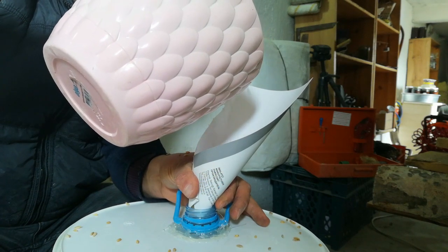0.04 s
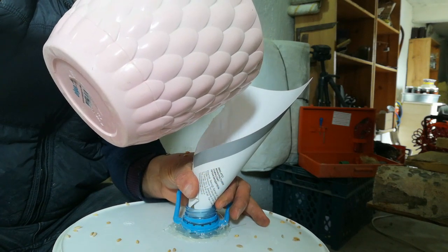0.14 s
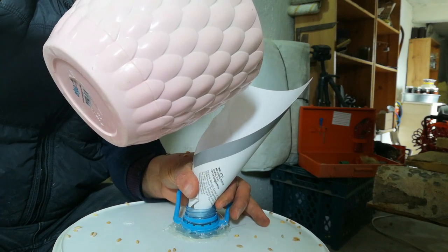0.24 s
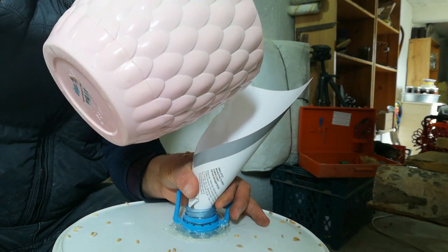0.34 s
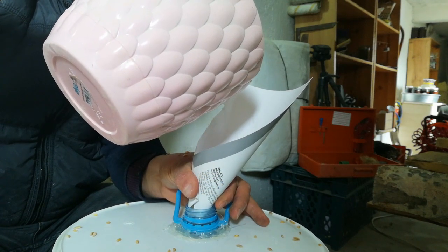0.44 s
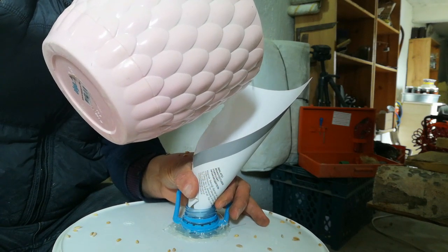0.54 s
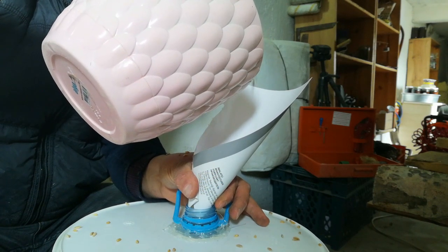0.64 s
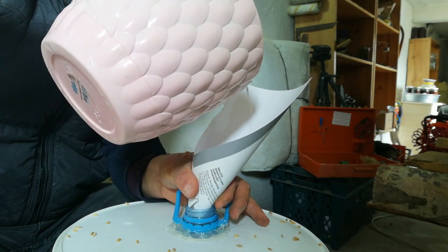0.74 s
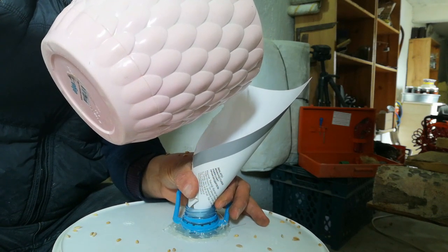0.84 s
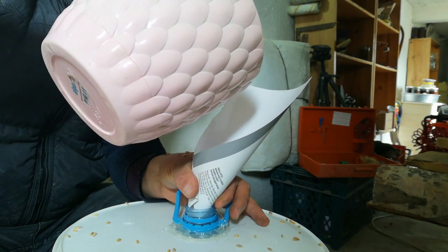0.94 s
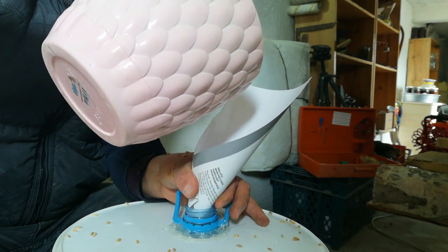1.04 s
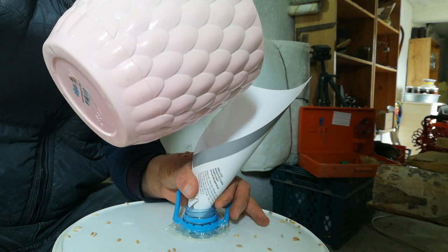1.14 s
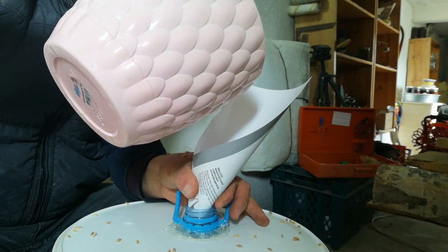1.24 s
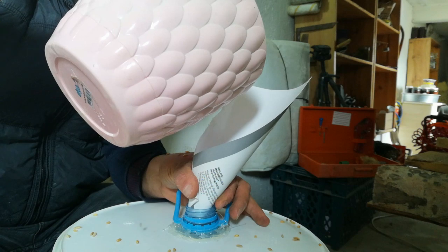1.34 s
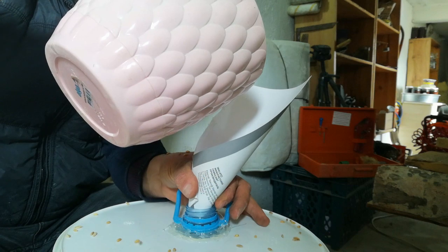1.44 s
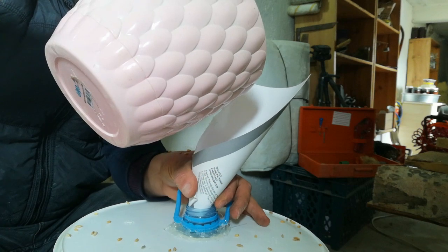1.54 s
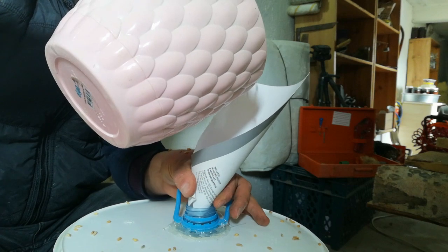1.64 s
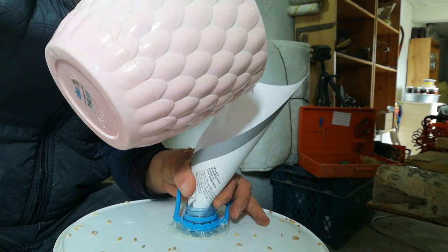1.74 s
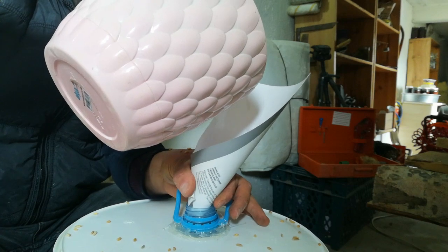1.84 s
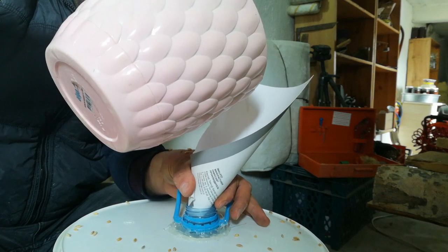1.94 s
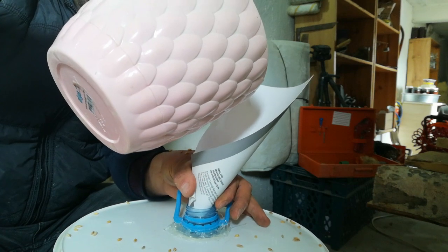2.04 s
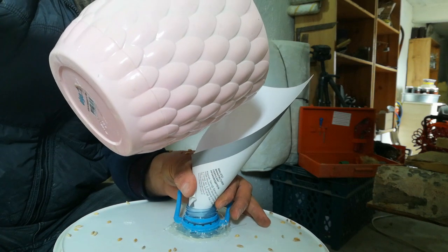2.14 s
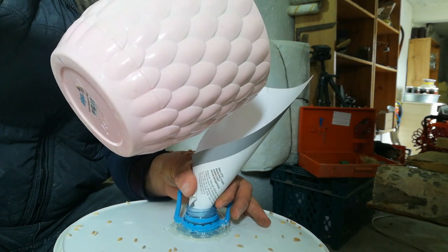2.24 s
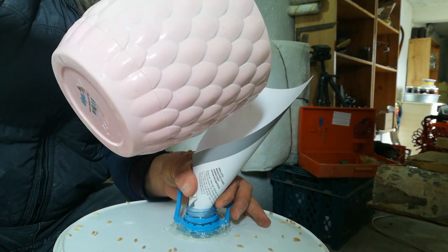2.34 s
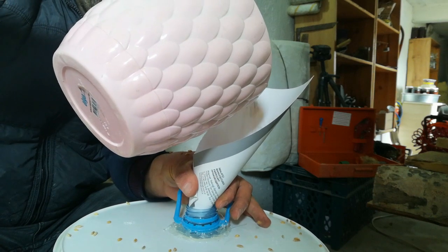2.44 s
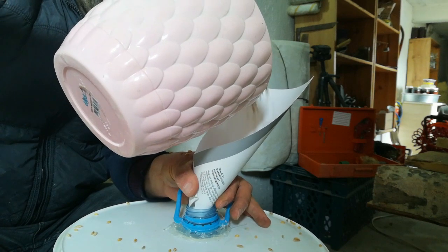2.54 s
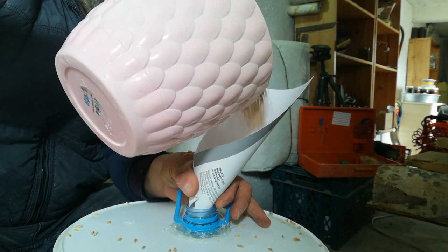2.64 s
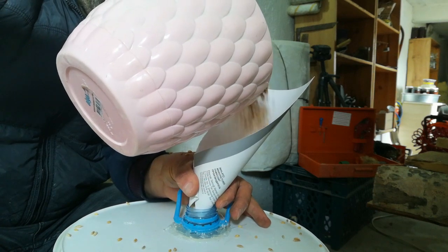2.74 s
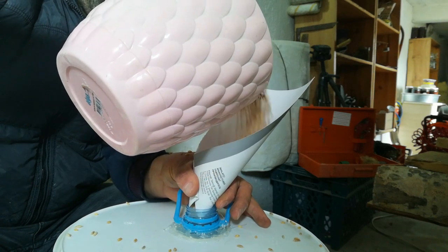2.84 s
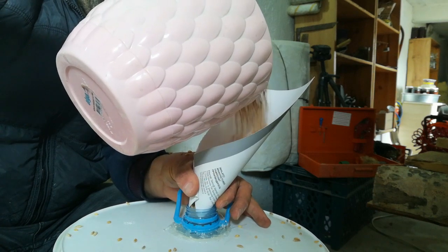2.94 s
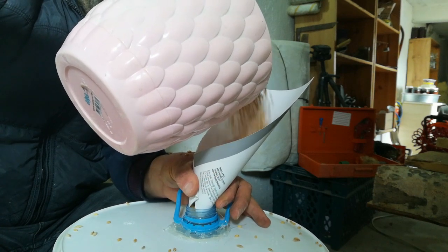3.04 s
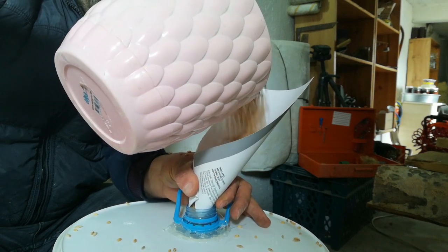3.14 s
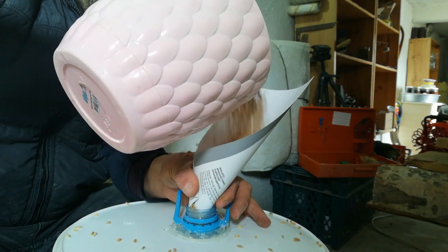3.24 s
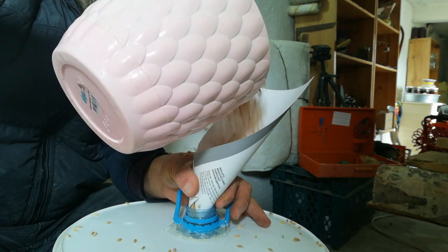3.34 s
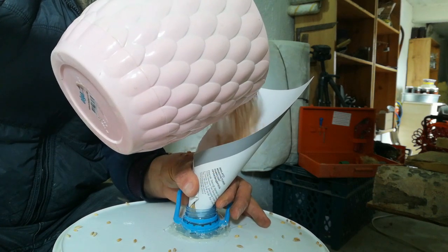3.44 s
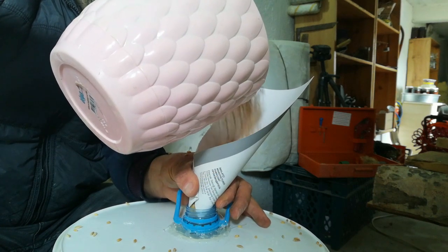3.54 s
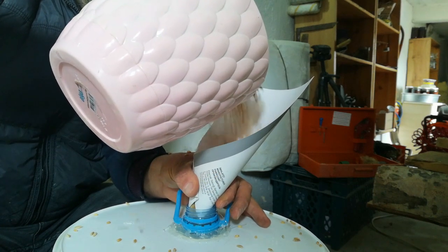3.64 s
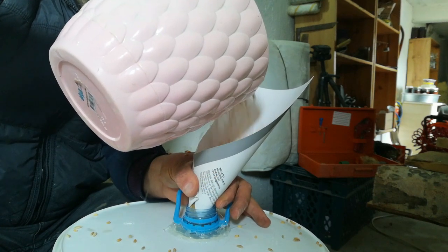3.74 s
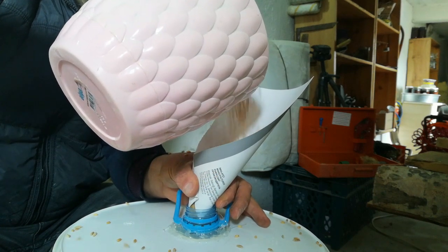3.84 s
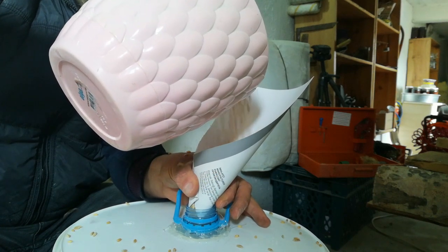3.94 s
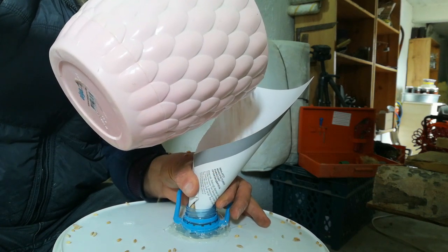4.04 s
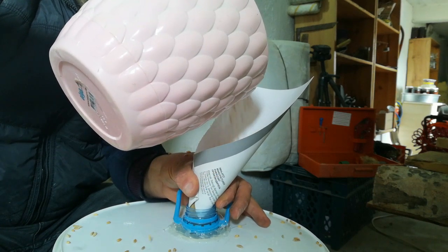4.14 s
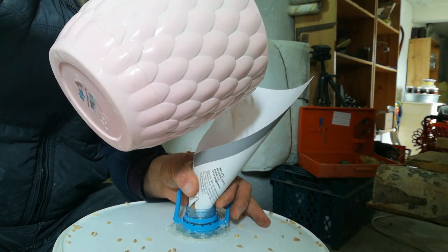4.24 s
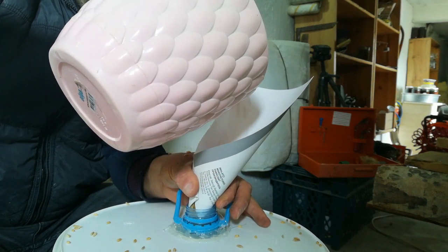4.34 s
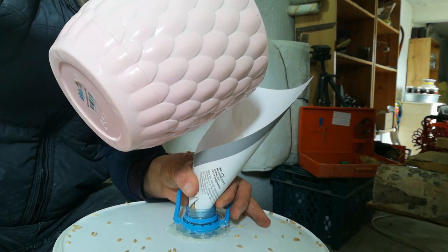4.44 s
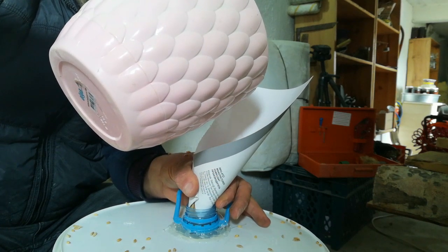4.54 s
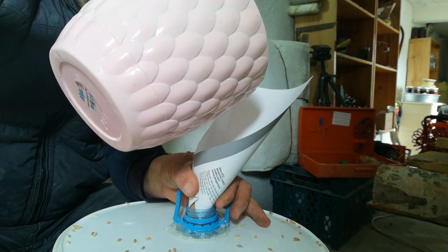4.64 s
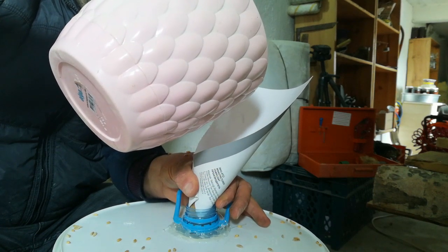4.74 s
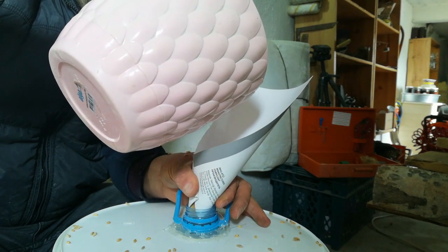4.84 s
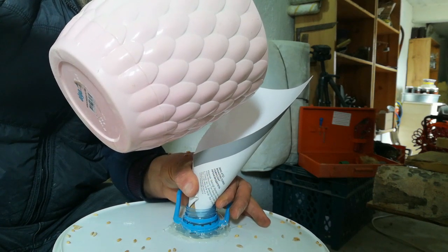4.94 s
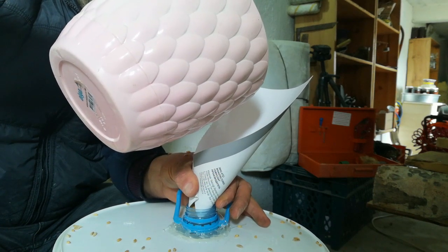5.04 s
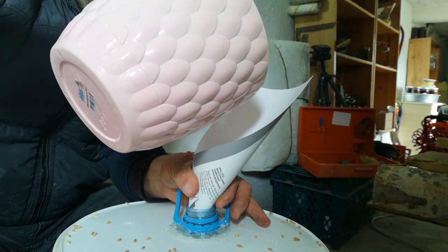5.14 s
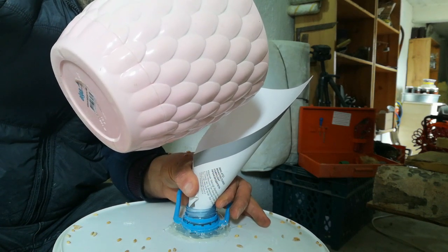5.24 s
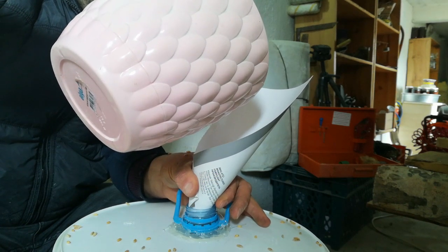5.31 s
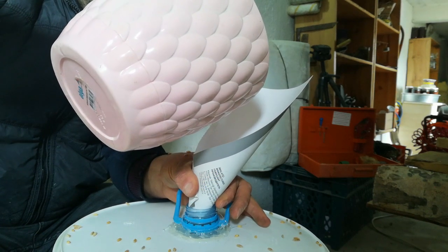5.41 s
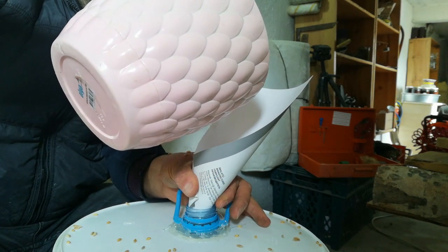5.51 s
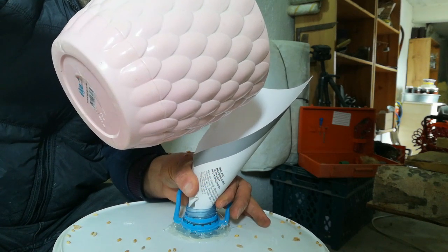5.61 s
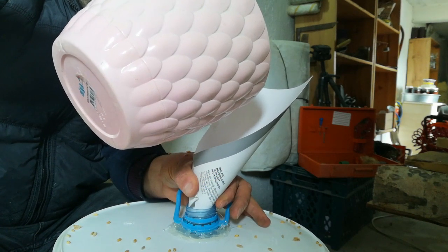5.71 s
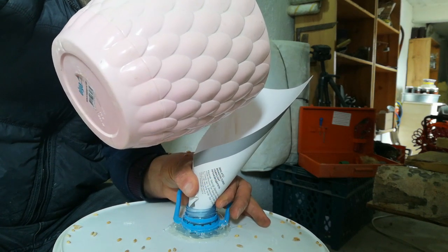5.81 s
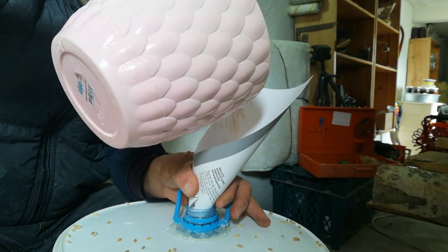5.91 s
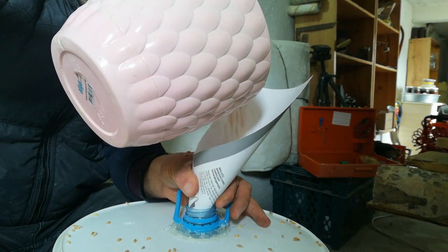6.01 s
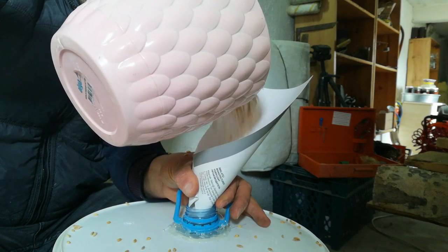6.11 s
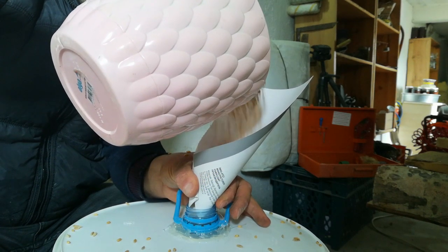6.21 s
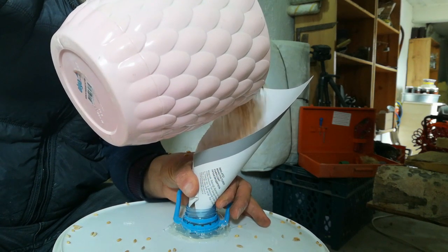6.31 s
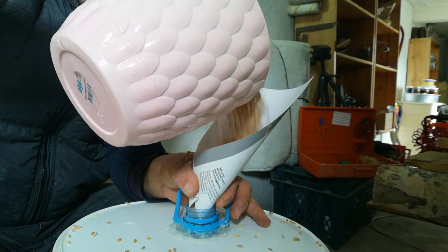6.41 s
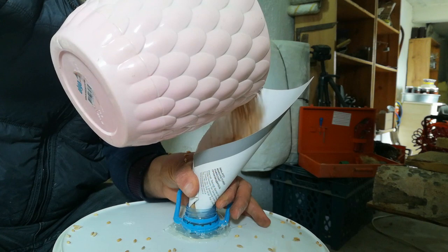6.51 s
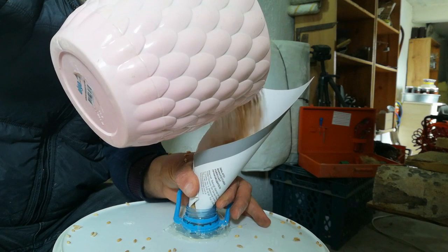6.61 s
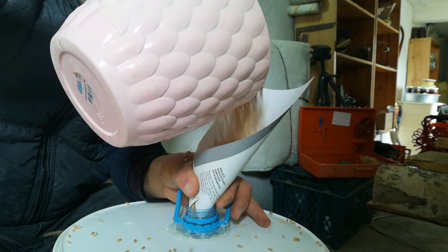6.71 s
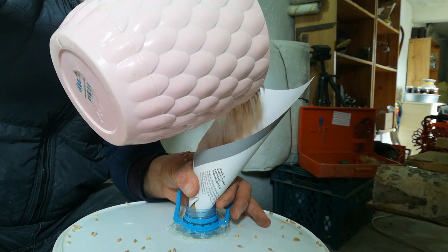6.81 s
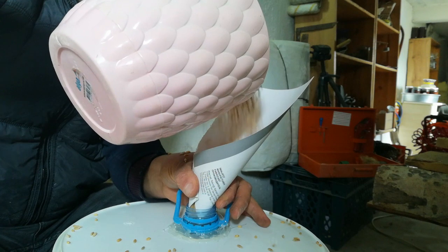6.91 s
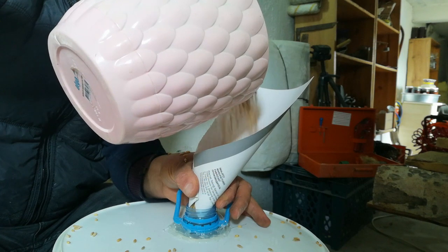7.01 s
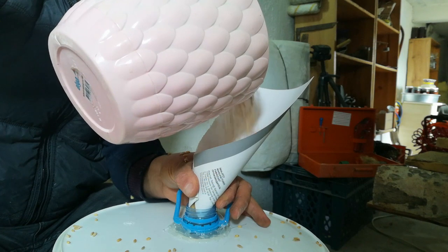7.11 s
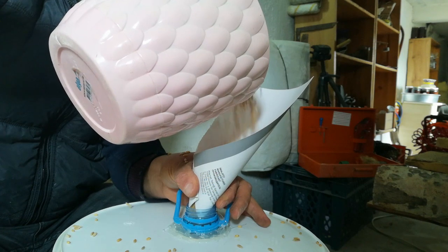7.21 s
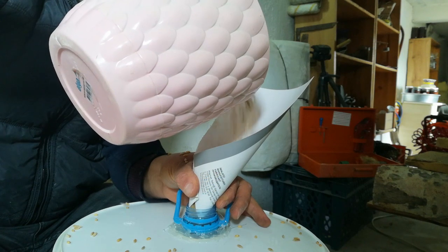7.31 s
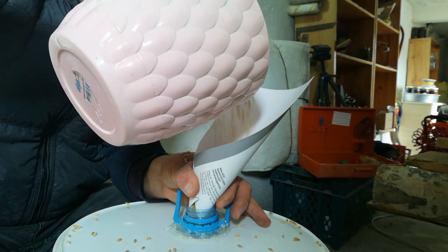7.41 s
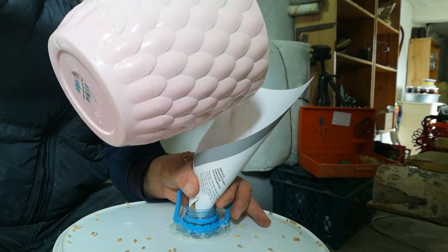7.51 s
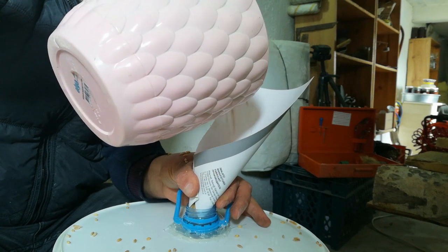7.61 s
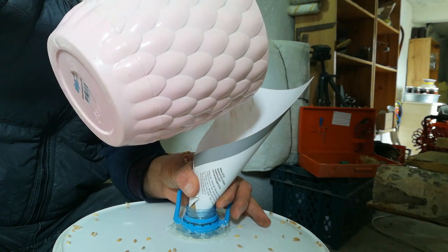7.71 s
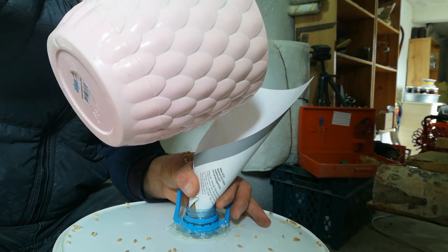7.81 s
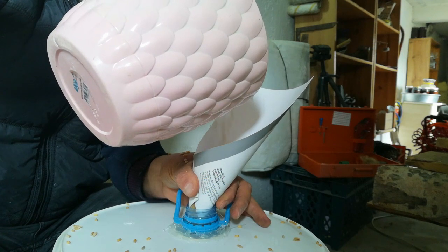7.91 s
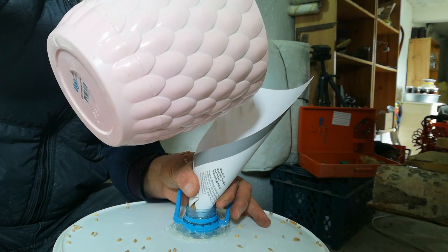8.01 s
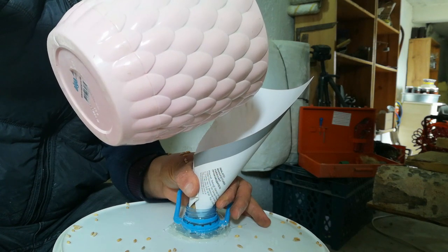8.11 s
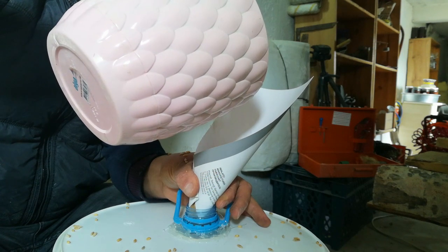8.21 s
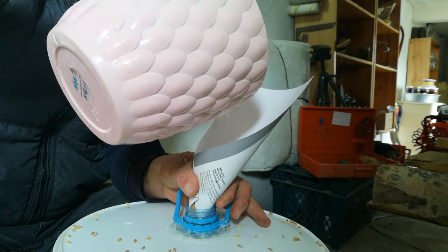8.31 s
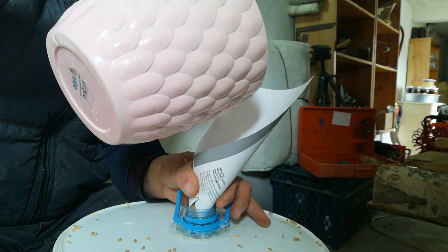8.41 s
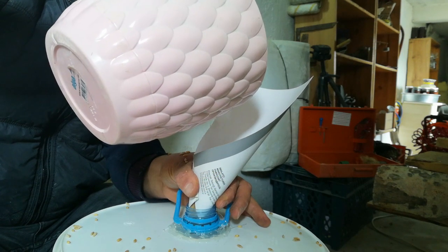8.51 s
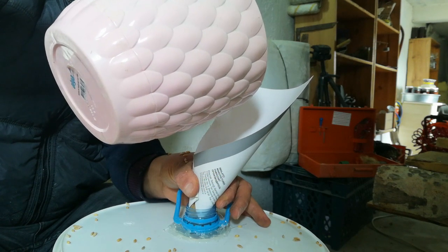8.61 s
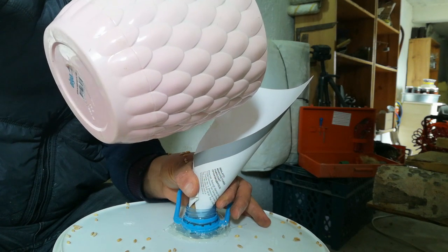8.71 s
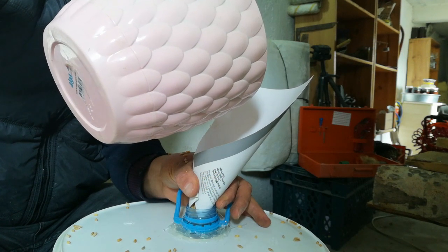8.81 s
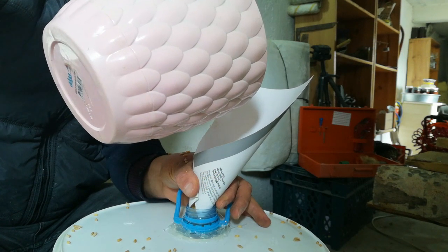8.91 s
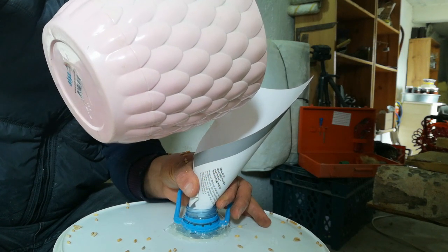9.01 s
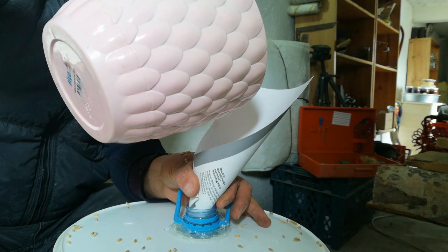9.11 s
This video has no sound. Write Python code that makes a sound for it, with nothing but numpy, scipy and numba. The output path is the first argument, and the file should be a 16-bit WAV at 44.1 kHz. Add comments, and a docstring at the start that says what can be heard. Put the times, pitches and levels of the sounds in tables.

```python
"""Dry seeds hiss and tick as they are tipped from a pot into a paper cone in two surges, close to two microphones.
Each seed is an impact, a click and a decaying noise coloured by the paper; the hard seeds also ring briefly,
each at its own pitch. Seeds dropping into a plastic bottle excite its low modes, and a diffuse noise tail gives
the small room's answer. A far motor hums as a few wavering sines over faint room noise, ducking as gain control
turns the surges down."""
import sys
import numpy as np
from scipy import signal
from scipy.fft import rfft, irfft, next_fast_len
from scipy.io import wavfile
from scipy.ndimage import uniform_filter1d
from numba import njit

SR = 44100
rng = np.random.default_rng(int(sys.argv[2]) if len(sys.argv) > 2 else 0)


def output_pcm(signal):
    """Save a mono or channel-first signal as 16-bit PCM at the path in sys.argv[1].

    Samples are clipped to [-1, 1] before scaling.
    """
    pcm = np.clip(np.atleast_2d(signal).T, -1, 1) * 32767
    wavfile.write(sys.argv[1], SR, np.round(pcm).astype(np.int16))


def gain_from_db(level_db):
    """Turn a decibel level (scalar or array-like) into a linear amplitude factor."""
    decades = np.asarray(level_db, float) / 20
    return 10 ** decades


N = 403956

# flow of seeds over the paper: (time [s], level [dB])
SEED_FLOW = [(0.0, -22), (0.5, -22.5), (0.85, -25), (0.96, -29), (1.15, -30), (1.22, -34), (1.39, -36),
             (1.51, -43), (2.5, -44), (2.54, -30), (2.565, -24), (2.62, -21), (2.69, -22), (2.87, -15),
             (3.32, -12), (3.73, -19), (4.68, -25), (4.76, -31), (5.2, -34), (5.595, -37), (5.612, -46),
             (5.71, -51), (6.05, -62), (6.054, -19.5), (6.28, -16.5), (6.58, -12), (6.9, -18), (7.5, -20.5),
             (8.0, -26), (8.4, -27), (8.46, -30), (8.89, -29), (9.09, -35), (9.16, -31)]
# handfuls that slip out while the flow is thin: (start [s], level [dB], length [s])
HANDFULS = [(1.27, -32, .12), (1.56, -30, .07), (1.685, -35, 0.0398), (1.78, -29, .03), (1.814, -26, 0.119),
            (1.94, -23, .05), (2.0, -27, .05), (2.05, -23, .05), (2.11, -27, .09), (2.235, -23, .09),
            (2.33, -30, .06), (2.44, -33, .1), (4.89, -34, .06), (5.07, -35, 0.0995), (5.55, -36, 0.0482),
            (5.825, -50, 0.0304), (5.93, -23, .06), (6.0, -30, .03), (8.18, -28, .05), (8.29, -28, .04)]
# seeds that stand out: (time [s], peak level [dB], paper body level [dB], top level [dB])
STANDOUT_TICKS = [(0.1395, -9, -39, 6), (0.164, -17, -25, -8), (0.2524, -4.5, -7.5, -12),
                  (0.2816, -5.5, -7, 6), (0.328, -7.5, -6, -15), (0.4011, -6.5, -9, -1),
                  (0.5045, -2.5, -10, -13), (0.6641, -2.5, -22, -9), (0.7454, -9, -2, 5),
                  (0.845, -5, -25, 1), (0.9009, -10.5, -8, 3), (0.998, -9, -23, 3.5), (1.0238, -10, -5, 3),
                  (1.069, -17.5, -27, 11), (1.0942, -10.5, -11, -1), (1.123, -10, -8, -1),
                  (1.1459, -5, -2.5, -9), (1.2, -5.5, -5.5, -7), (1.2716, -10.5, -7.5, 0),
                  (1.3178, -17, -18, 12.5), (1.3486, -3, -13.5, -8), (1.3777, -17, -26, -3),
                  (1.4303, -17.5, -5.5, 11), (1.479, -19.5, -28, 3), (1.5127, -22, -18, -2),
                  (1.56, -5.5, -10, 0), (1.5778, -10.5, -9, 1), (1.6841, -13.5, -14, -4),
                  (1.7228, -22, -1, 4), (1.7852, -16, -12, 7), (1.814, -21, -20, -8),
                  (1.8571, -13, -21, 4.5), (1.9178, -12, -16, 11.5), (1.94, -11, -11, -5),
                  (1.952, -8, -18, 6.5), (1.97, -13, -23, 3), (1.9939, -20, -25, -3),
                  (2.0477, -7.5, -9, -3), (2.0718, -4, -11, 0), (2.08, -8.5, -18, 4), (2.155, -17, -1, 4),
                  (2.177, -4, -15, -5), (2.1871, -8, -15, -9), (2.2207, -12, -7, -6), (2.235, -10, -5, 2),
                  (2.242, -6.5, -7, -3), (2.2657, -3, -7.5, -20), (2.293, -2, -7, -9),
                  (2.3401, -7.5, -24, 2), (2.3601, -16, 4.5, -1.5), (2.4412, -11.5, -0.5, 9.5),
                  (2.4848, -9, -8.5, -2), (2.518, -14.5, -2.5, 9.5), (4.8013, -16.5, -10, -3),
                  (4.8884, -13, -10, 2), (5.1533, -9, -17, -22), (5.2678, -25, -21, -1),
                  (5.2853, -24, -21, -5), (5.3357, -23.5, -1.5, -15), (5.3933, -19, -23, -16),
                  (5.4372, -17, -26, 3.5), (5.4659, -25, -12, -12), (5.4888, -24, -17, -12),
                  (5.5185, -16, -24, -14), (5.547, -16.5, -23, -17), (5.5961, -19, -18, -3),
                  (5.6702, -33, -17, 0), (5.755, -31, -19, -19), (5.9098, -34, -21, -12),
                  (5.9319, -8, -37, -20), (5.9568, -15, -31, -11), (5.9684, -8, -19, -7),
                  (6.0278, -13, -15, -7), (6.0536, -7, -28, -1), (6.078, -12, -22, -11),
                  (6.1504, -6.5, -15, 0), (8.0542, -11, -11, -2), (8.0729, -9.5, -12, 3),
                  (8.2523, -12.5, -7, 3), (8.4781, -17.5, 0.5, -14), (8.63, -16.5, -4, 4.5),
                  (8.6821, -16, -25, 8), (8.8403, -25, 10, -1), (9.1396, -16, -22, 7),
                  (9.1544, -18, -29, -9.5)]
# treble of the stream against its flow: (flow level [dB], top level [dB])
TOP_BY_FLOW = [(-55, -7), (-41.5, -3), (-29, -0.5), (-30, 1.5), (-3, 1.5)]
# pot and stream: (time [s], rim level against flow [dB], left minus right [dB],
# bottle level [dB], paper body level against flow [dB])
POUR = [(0.0, 0, -2, -44, -11), (0.5, -7, 1.5, -46.5, -6.5), (0.7, -9, 0.5, -48, -9.5),
        (0.9, 5, -2, -49, -4.5), (1.15, -13, 2.5, -49, -7.5), (1.37, -11, 3, -48, -7),
        (1.6, -20, 2, -55, -14.5), (1.85, -15, 2, -55, -7), (2.06, -16, 1, -51, -10),
        (2.3, -18, 2, -43, -6.5), (2.5, -12, 1.5, -51, -7), (2.75, -2, -1, -47, -9.5),
        (3.0, -0.5, 0.5, -40, -9), (3.2, 1, 1, -37, -6), (3.45, 3.5, 0.5, -38, -7),
        (3.66, -4, -5.5, -43, -7.5), (3.9, -2, -5.5, -46, -8), (4.12, 0.5, 0, -46, -6),
        (4.58, 0.5, -0.5, -47, -9), (5.05, 2, -2, -48, -7.5), (5.5, -4, 1.5, -51, -6.5),
        (5.72, -16, 4, -63, -6.5), (5.92, -21, 2.5, -60, -12.5), (6.18, -3, 0.5, -47, -8.5),
        (6.4, 1.5, -1, -39, -6.5), (6.65, 2.5, 2, -38, -6.5), (6.87, -0.5, -5, -44, -7.5),
        (7.1, 1, -7, -47, -7.5), (7.33, -4, 1, -48, -7.5), (7.8, 2, -1, -48, -8.5),
        (8.1, -7, -0.5, -49, -7.5), (9.16, 1, 0.5, -49, -7.5)]
# colour of the paper: (frequency [Hz], level per Hz [dB])
PAPER_COLOUR = [(260, -72), (450, -28.5), (570, -33), (742, -16.5), (811, -18), (1320, -8), (2210, -3.5),
                (4750, 0), (5340, -0.5), (7170, 0), (8060, -3), (9210, -4), (10800, -14), (15200, -24)]
# resonances of the cone: (frequency [Hz], width [Hz], boost [dB])
CONE_MODES = [(742, 39, 4), (1019, 19, 7), (1300, 90, 3), (1800, 26, 5), (3314, 240, 3), (8180, 580, 3)]
# rattle band of the pot's rim: (frequency [Hz], width [Hz], level [dB], not used)
RIM_BAND = [(4600, 2250, 0)]
# air and wall modes of the bottle: (frequency [Hz], width [Hz], relative level [dB])
BOTTLE_MODES = [(225, 36, 4.5), (297, 140, -1), (379, 42, -0.5), (452, 41, -7.5), (750, 110, -4.5),
                (850, 94, -5.5)]
# lines of the motor: (frequency [Hz], rms level [dB] before waver and side gain)
MOTOR_LINES = [(114.9, -62), (153.2, -49), (229.8, -84), (301, -91)]
# colour of the room noise: (frequency [Hz], level per Hz [dB])
ROOM_COLOUR = [(20, -1), (60, -2), (100, 1), (200, -30.5), (400, -45), (600, -14), (1300, -8), (4800, -2.5),
               (9000, -9), (15300, -26)]
# tone of the microphone pair: (frequency [Hz], left minus right [dB])
PORT_BALANCE = [(500, 0.1), (1800, 1), (2600, -3), (4300, 2.8), (5500, 0), (6800, -2), (8200, -11),
                (11000, -10), (15000, -9)]
# shared part of the noise at the pair: (frequency [Hz], likeness [0-1])
PORT_LIKENESS = [(50, 0.68), (130, 0.48), (260, 1), (700, 0.05), (1400, 0.87), (2200, 0.097), (4000, 0.53),
                 (7000, 0.35), (10000, 0.024)]

LEFT_LAG_S = 6e-5
ROOM_TONE_DB = -49.5
SEEDS_PER_S_MAX, BOUNCES_PER_S = 3000, 28
HANDFUL_SAG_DB_PER_S, HANDFUL_END_DB_PER_S = 25, 328
SETTLE_S = .15  # the treble follows the flow averaged over this time
# bright ring of the patch that is hit; its level is against the tick's peak
PING_HZ, PING_T60_S, PING_DB = 4330, 0.031, -11
# low ring of the cone wall; its level adds to the peak and body of the blow
KNOCK_HZ, KNOCK_T60_S, KNOCK_DB = 1105, 0.065, -14

SIZE = next_fast_len(N + SR // 2, True)
HZ = np.arange(SIZE // 2 + 1) * SR / SIZE + 1e-3
LOG_HZ = np.log(HZ)
LATE = np.exp(-2j * np.pi * HZ * LEFT_LAG_S)
TIME = np.arange(N) / SR


def paper_cone(level_db, body_db, top_db, rim_db, pan_db, hard, noise):
    """Impact and sliding friction: one resonant colour whose body, middle and top respond differently to the flow."""
    at, size = stream(level_db - 1.96, full_db=-15, thinning=.9, spread_db=3.0, clump_db=2.5, clump_rate=60)
    s, peak_db, tick_body_db, tick_top_db, tick_pan_db = hard.T
    hard_at = (s * SR).astype(int)
    colour_db = rng.standard_normal((len(at), 3)) * 4.24  # every stream seed lands with its own tone and side
    pan = np.r_[pan_db[at] + colour_db[:, 0], pan_db[hard_at] + tick_pan_db]
    # a blow is spread over the rattle that follows, so it starts stronger than the peak heard
    blows = np.r_[size, gain_from_db(peak_db + 13.5)] * gain_from_db(np.array([pan, -pan]) / 2)
    # the sliding mass slips in short jerks
    hiss_db = level_db - 3.5 + 0.18 * (level_db + 24.5) + 0.2 * walk(12) + 0.94 * walk(70)

    low = 1 / (1 + (HZ / 2400.) ** 4)
    high = 1 - 1 / (1 + (HZ / 6500.) ** 6)
    cone_db = sum(mode[2] * bell for mode, bell in zip(CONE_MODES, bells(CONE_MODES)))
    colour = unit(gain_from_db(on_hz(PAPER_COLOUR) + cone_db), 2920, 5850)
    colour = colour * gain_from_db(np.array([[.5], [-.5]]) * on_hz(PORT_BALANCE))
    # part of the colour, its level in the stream, for hard seeds and per seed, its level at the typical colour
    parts = [(low, body_db, tick_body_db, colour_db[:, 1], -8.5),
             (1 - low - high, 0 * level_db, 0 * s, 0, 0),
             (high, top_db, tick_top_db, colour_db[:, 2], .3)]
    sizes = np.vstack([blows * gain_from_db(np.r_[flow_db[at] + own_db, tick_db] - usual_db)
                       for _, flow_db, tick_db, own_db, usual_db in parts])
    ticks = strike(np.r_[at, hard_at], sizes, noise, crack_t60=.012, t60=0.057, ring_db=-5.5,
                   room_t60=0.12, room_db=-12.5, click_db=-13.5)
    total = 0
    for (part, flow_db, _, _, usual_db), tick in zip(parts, ticks):
        hiss = two_ports(gain_from_db(hiss_db + flow_db - usual_db), pan_db)
        total = total + part * tick + np.sqrt(np.abs(part)) * hiss
    # seeds crowding over the hard rim of the pot rattle in a narrower band, stronger on the left
    rim_colour = unit(bells(RIM_BAND)[0], 2500, 7500) * gain_from_db(np.array([[2.5], [-2.5]]))
    return total * colour + two_ports(gain_from_db(hiss_db + rim_db)) * rim_colour


def seed_flow():
    """Power addition: the flow on the paper plus handfuls that start at once, sag and stop."""
    power = gain_from_db(2 * np.interp(TIME, *np.transpose(SEED_FLOW)))
    for s, db, length in HANDFULS:
        age = np.maximum(TIME - s, 0)
        fall_db = HANDFUL_SAG_DB_PER_S * age + HANDFUL_END_DB_PER_S * np.maximum(age - length, 0)
        power = power + (TIME >= s) * gain_from_db(2 * (db - fall_db))
    return power


def stream(level_db, full_db, thinning, spread_db, clump_db, clump_rate):
    """Random arrivals: seeds thin out with the flow and clump; returns (sample, size), mean power near the curve."""
    count = int(SEEDS_PER_S_MAX * N / SR)
    when, lot, luck = rng.random((count, 3)).T
    at = (when * N).astype(int)
    thin_db = thinning * (level_db - full_db)
    share = np.clip(gain_from_db(thin_db + clump_db * walk(clump_rate)), .004, 1)
    mean_share = np.clip(gain_from_db(thin_db), .004, 1)
    size = gain_from_db(np.minimum(-spread_db * np.log(1 - luck), 13.))  # many small seeds, few hard blows
    size = size / np.sqrt(np.mean(size ** 2))
    size = size * gain_from_db(level_db[at]) * np.sqrt(SR / SEEDS_PER_S_MAX / mean_share[at])
    kept = lot < share[at]
    return at[kept], size[kept]


def hard_seeds(level_db):
    """Random impacts: bounces above the flow and listed ticks, as rows of (s, peak dB, body dB, top dB, side dB)."""
    count = int(BOUNCES_PER_S * N / SR)
    s = rng.random(count) * N / SR
    luck = rng.standard_normal((count, 3)).T
    peak_db = np.minimum(level_db[(s * SR).astype(int)] + 9.0, -8.) + 2.26 * luck[0]
    bounces = np.c_[s, peak_db, -20 + 5.5 * luck[1], -4 + 6 * luck[2]]
    rows = np.r_[bounces, STANDOUT_TICKS]
    return np.c_[rows, -1.5 + 3.0 * rng.standard_normal(len(rows))]


def strike(at, size, noise, crack_t60, t60, ring_db, room_t60, room_db, click_db):
    """Impact and reverberation: spectra of click, crack, wall rattle and room (size rows alternate left, right)."""
    def fall(t60, count):
        return np.exp(-np.log(1000) * np.arange(count) / SR / t60)

    envelope = fall(crack_t60, 900) + gain_from_db(ring_db) * fall(t60, 900)
    envelope = envelope * (1 - fall(0.0021, 900))
    room = fall(room_t60, SR // 2) * (1 - fall(0.14, SR // 2))  # reflections build up gradually
    out = np.zeros((len(size), SIZE), np.float32)
    add(out, at, np.float32(size), rng.integers(0, N, len(at)), np.float32(noise),
        np.float32(envelope / np.linalg.norm(envelope)), np.float32(gain_from_db(click_db)))
    echo = 1 + gain_from_db(room_db) * two_ports(room / np.linalg.norm(room))
    return rfft(out).reshape(-1, 2, len(HZ)) * echo


@njit
def add(out, at, size, start, noise, envelope, click):
    """Superposition: each blow adds a click of contact, then its own piece of noise under the envelope."""
    for k in range(len(at)):
        for row in range(len(out)):
            there, piece, gain = out[row, at[k]:], noise[row % 2, start[k]:], size[row, k]
            there[0] += gain * click
            for i in range(len(envelope)):
                there[i] += gain * envelope[i] * piece[i]


def pings(hard):
    """Damped free vibration: each hard seed leaves a bright ping and a low knock of scattered pitch."""
    s, peak_db, body_db, _, pan_db = hard.T[:, :, None]
    i = np.arange(SR // 25)
    scatter = rng.standard_normal((len(s), 2, 1))

    def tone(hz, t60, db):
        return gain_from_db(db - 60 * i / SR / t60) * np.sin(2 * np.pi * hz * i / SR)

    ping_hz = PING_HZ * 1.2 ** scatter[:, 0]
    knock_hz = KNOCK_HZ * 1.25 ** np.clip(scatter[:, 1], -1.7, 2)
    ring = tone(ping_hz, PING_T60_S, peak_db + PING_DB)
    ring = ring + tone(knock_hz, KNOCK_T60_S, peak_db + body_db + KNOCK_DB)
    at = ((s * SR).astype(int) + i).ravel()
    return np.array([np.bincount(at, (ring * gain_from_db(side * pan_db / 2)).ravel(), SIZE)[:N] for side in (1, -1)])


def bottle(level_db, hard, noise):
    """Modal excitation: landing seeds drive the air and wall modes; hard blows on the cone shake them too."""
    at, size = stream(level_db, full_db=-34, thinning=.6, spread_db=4.0, clump_db=2.5, clump_rate=15)
    s, peak_db, body_db = hard.T[:3]
    at = np.r_[at, (s * SR).astype(int)]
    size = np.r_[size, gain_from_db(peak_db + body_db - 5)]
    thuds = strike(at, np.array([size, size]), noise, crack_t60=0.0095, t60=0.061, ring_db=-4,
                   room_t60=0.36, room_db=-11, click_db=-37)[0]
    power = sum(gain_from_db(2 * mode[2]) * bell ** 2 for mode, bell in zip(BOTTLE_MODES, bells(BOTTLE_MODES)))
    return thuds * unit(np.sqrt(power), 185, 420)


def motor():
    """Line spectrum: steady sines that waver a little in level, slightly stronger on the right."""
    lines = 0
    for hz, db in MOTOR_LINES:
        sine = np.sin(2 * np.pi * (hz * TIME + rng.random()))
        lines = lines + gain_from_db(db + .6 * walk(6.5)) * np.sqrt(2) * sine
    return lines * gain_from_db(np.array([[-.3], [.3]]))


def room_tone():
    """Stationary broadband noise: the faint tone of the room, stronger on the right."""
    colour = gain_from_db(ROOM_TONE_DB) * unit(gain_from_db(on_hz(ROOM_COLOUR)), 500, 15000)
    return two_ports(np.ones(N)) * colour * gain_from_db(np.array([[-1.3], [1.3]]))


def two_ports(envelope, pan_db=0):
    """Partial coherence: noise spectra at two microphones; the shared part reaches the left late, the rest is panned."""
    sides = gain_from_db(np.outer([0, 1, -1], pan_db) / 2)
    shared, left, right = rfft(rng.standard_normal((3, len(envelope))) * envelope * sides, SIZE)
    like = np.clip(on_hz(PORT_LIKENESS), 0, 1)
    shared, own = np.sqrt(like) * shared, np.sqrt(1 - like)
    return np.array([shared * LATE + own * left, shared + own * right])


def on_hz(table):
    """Logarithmic frequency scale: a (Hz, value) table read between its points."""
    hz, value = np.transpose(table)
    return np.interp(LOG_HZ, np.log(hz), value)


def bells(modes):
    """Resonance curves: one per mode, top at 1, half height at the edges of its width."""
    return [1 / (1 + ((HZ - hz) / (width / 2)) ** 2) for hz, width, _ in modes]


def unit(gain, lo_hz, hi_hz):
    """Band power: scale a colour so that unit white noise comes out at rms 1 between the two edges."""
    return gain / np.sqrt(np.sum(gain[(HZ > lo_hz) & (HZ < hi_hz)] ** 2) / len(HZ))


def walk(rate):
    """Slow random modulation: levels held 1 / rate s and smoothed twice; spread near 1."""
    k = int(SR / rate)
    held = np.repeat(rng.standard_normal(N // k + 1), k)
    return 1.3 * uniform_filter1d(uniform_filter1d(held, k), k)[:N]


def scene():
    """Superposition: paper, bottle and room tone add as spectra, rings and hum as waveforms."""
    power = seed_flow()
    level_db = 10 * np.log10(power)
    settled_db = 10 * np.log10(uniform_filter1d(power, int(SETTLE_S * SR)) + 1e-12)
    # the treble drifts as the landing spot wanders
    top_db = np.interp(settled_db, *np.transpose(TOP_BY_FLOW)) + 0.84 * walk(3.796)
    s, *columns = np.transpose(POUR)
    rim_db, pan_db, bottle_db, body_db = (np.interp(TIME, s, column) for column in columns)
    hard = hard_seeds(level_db)
    noise = irfft(two_ports(np.ones(SIZE)), SIZE)  # blows cut their rattle from this noise
    near = paper_cone(level_db, body_db, top_db, rim_db, pan_db, hard, noise)
    near = near + bottle(bottle_db, hard, noise) + room_tone()
    return irfft(near, SIZE)[:, :N] + pings(hard) + motor()


def low_pass(x):
    """Removes everything above the highest recorded frequency."""
    return signal.sosfilt(signal.butter(12, 15340, fs=SR, output="sos"), x)


def record(dry):
    """Dynamic compression and clipping: gain control turns surges down; peaks hit the converter's ceiling."""
    smoothing = 1 / (.15 * SR)  # power averaged over .15 s
    power = signal.lfilter([smoothing], [1, smoothing - 1], np.mean(dry ** 2, axis=0))
    gain = (1 + (power / gain_from_db(2 * -8.)) ** 0.4) ** -.3
    return low_pass(np.clip(1.144 * dry * gain, -1, 1))


dry = scene()
out = record(dry)
output_pcm(out)
```